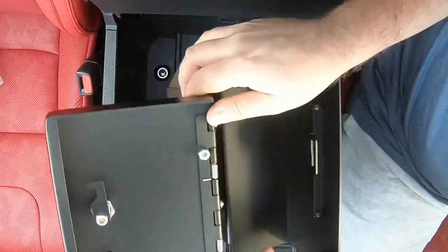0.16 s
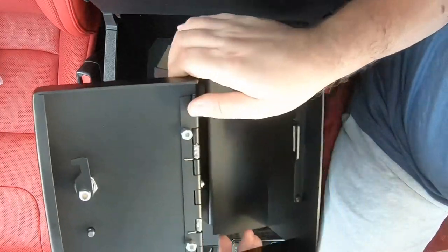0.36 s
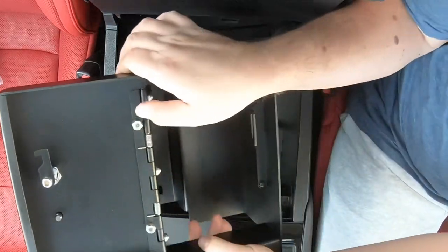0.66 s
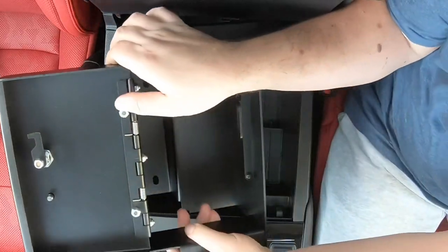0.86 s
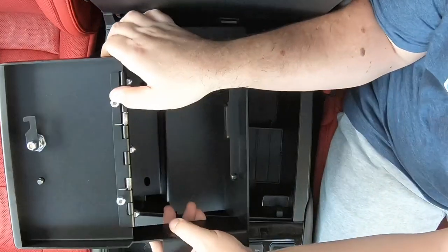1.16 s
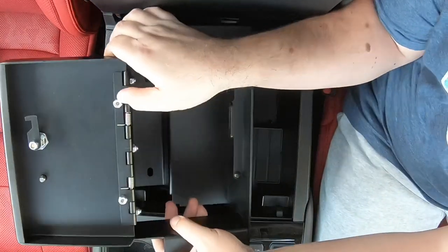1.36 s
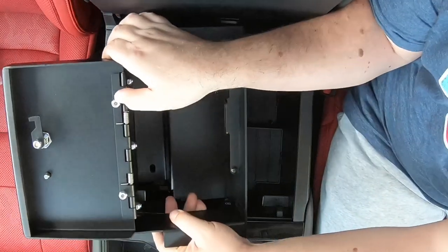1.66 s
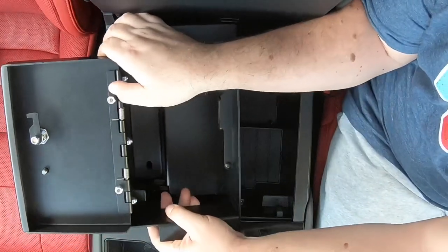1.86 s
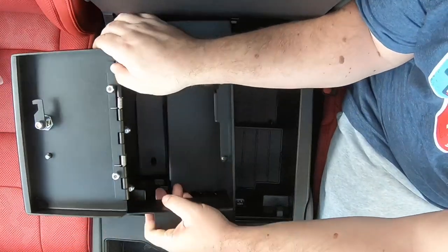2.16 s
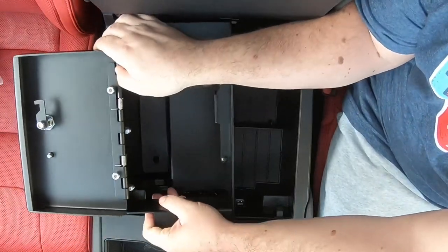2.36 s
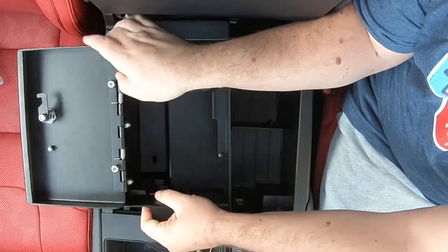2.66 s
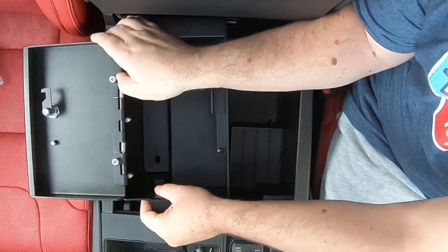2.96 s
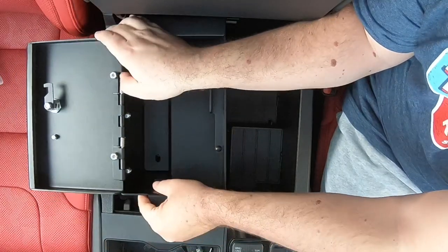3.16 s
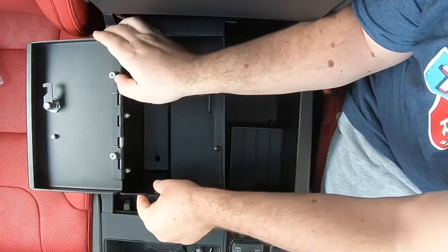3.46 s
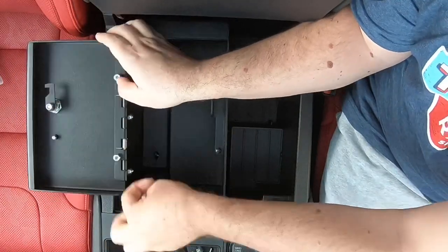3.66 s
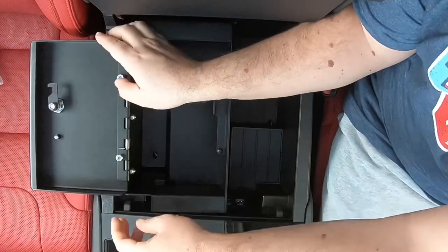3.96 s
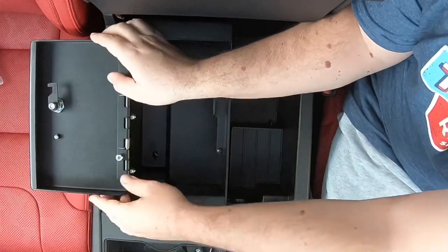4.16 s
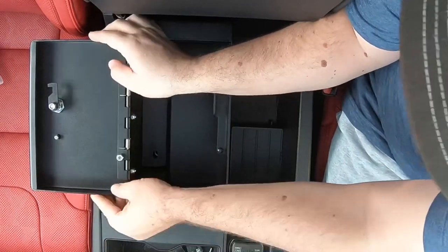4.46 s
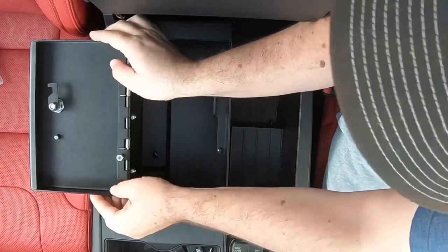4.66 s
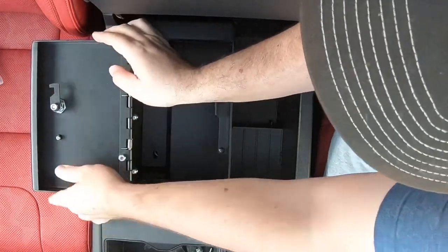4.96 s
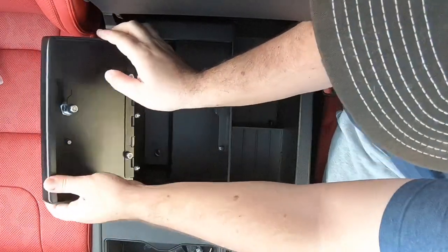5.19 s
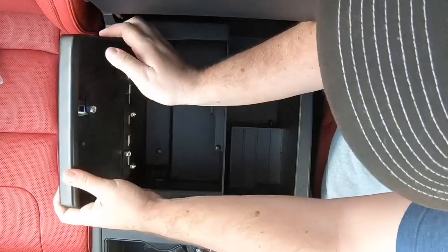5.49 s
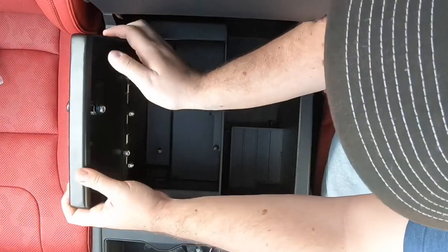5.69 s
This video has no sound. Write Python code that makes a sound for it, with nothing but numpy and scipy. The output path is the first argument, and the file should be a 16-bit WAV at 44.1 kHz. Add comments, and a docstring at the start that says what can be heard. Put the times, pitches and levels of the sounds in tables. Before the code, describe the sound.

Close, dry sound inside a quiet parked car: light taps and soft scraping with faint hiss as a steel box is held, then a hard thud as it lands in a hollow plastic bin. Isolated clacks follow, then busier knocking and rubbing, a tight cluster of loud bangs and scrapes, a near-quiet pause, and one sharp scraping clack. Low booming shakes the microphone, mostly on the right.

```python
"""Light knocks, thuds and soft scraping over hiss, then hard clacks and thuds:
a steel safe is lowered into the plastic console bin of a parked car and worked into place.
Contacts ring damped steel and console modes under shaped noise bursts; sliding drives them with noisy slips.
The jolts also shake the camera mount, whose drifting sines boom and sway, mostly into the right microphone."""
import sys
import numpy as np
from scipy import signal
from scipy.fft import rfft, irfft, next_fast_len
from scipy.io import wavfile
from scipy.ndimage import map_coordinates

SR = 44100
rng = np.random.default_rng(int(sys.argv[2]) if len(sys.argv) > 2 else 0)


def bounce(signal):
    """Save signal as a 16-bit WAV file at the path given by the first command-line argument."""
    frames = np.transpose(np.atleast_2d(signal))
    limited = np.clip(frames, -1, 1)
    pcm = np.round(limited * 32767).astype(np.int16)
    wavfile.write(sys.argv[1], SR, pcm)


N = 257103


def amp(db):
    """Decibels to gain."""
    return 10 ** (np.asarray(db) / 20)


def unit(x):
    """Scale to rms 1."""
    return x / np.sqrt(np.mean(x ** 2) + 1e-20)


def fade(t, t60):
    """Decay by 60 dB in t60 seconds."""
    return np.exp(-np.log(1000) * t / t60)


def along(points, hz, axis=1):
    """One column of a frequency table, read on a log axis."""
    table = np.transpose(points)
    return np.interp(np.log(hz + 1), np.log(table[0] + 1), table[axis])


def curves(rows):
    """One value per sample for each column after the time."""
    time_s, *columns = np.transpose(rows)
    return [np.interp(np.arange(N) / SR, time_s, column) for column in columns]


def wobble(rate_hz):
    """A smooth random curve, rate_hz knots a second."""
    knots = rng.standard_normal(int(N * rate_hz / SR) + 4)
    return map_coordinates(knots, [np.arange(N) * rate_hz / SR])


def add(track, time_s, sound):
    """Mix a sound into a track at time_s."""
    start = max(round(time_s * SR), 0)
    part = sound[..., :N - start]
    track[..., start:start + part.shape[-1]] += part


def filtered(x, response):
    """x times a complex response of frequency."""
    size = 2 * next_fast_len(N // 2 + 8192)
    hz = np.fft.rfftfreq(size, 1 / SR)
    return irfft(rfft(x, size) * response(hz), size)[..., :N]


def coloured(x, spectrum):
    """Causal (minimum-phase) filter with the given spectrum; white noise keeps its power."""
    def response(hz):
        cepstrum = irfft(np.log(unit(amp(along(spectrum, hz))) + 1e-6))
        cepstrum[1:len(hz) - 1] *= 2
        cepstrum[len(hz):] = 0
        return np.exp(rfft(cepstrum))
    return filtered(x, response)


def ring(modes, t):
    """One damped sine for each mode; mode gains have rms 1, divided by the root of their number."""
    hz, db, t60 = np.transpose(modes)[:, :, None]
    gain = unit(amp(db)) / np.sqrt(len(modes))
    return gain * np.sin(2 * np.pi * hz * t) * fade(t, t60)


def resonate(x, modes, seconds=0.23):
    """Pass a pair of signals through a set of modes; white noise keeps its power."""
    answer = ring(modes, np.arange(round(seconds * SR)) / SR).sum(axis=0)
    return signal.fftconvolve(x, answer[None] / np.linalg.norm(answer), axes=1)[:, :N]


SWELL_SHAPE = 1.11  # exponent: 1 pointed, 2 rounded


def swells(rows):
    """Sum of swells (peak, rise, fall, levels): one strength curve for each level column."""
    force = np.zeros((len(rows[0]) - 3, N))
    t = np.arange(-SR // 2, SR) / SR
    for peak_s, rise_s, fall_s, *levels_db in rows:
        shape = np.exp(-np.abs(t / np.where(t < 0, rise_s, fall_s)) ** SWELL_SHAPE)
        add(force, peak_s + t[0], amp(levels_db)[:, None] * shape[peak_s + t >= 0])
    return force


LANDING_S, LANDING_FADE_S = .98, 0.024


def lifted(change_db):
    """A gain of change_db while the safe is held in the air, and of 0 dB once it has landed."""
    return amp(curves([(LANDING_S - LANDING_FADE_S, change_db), (LANDING_S, 0)])[0])


HUSH_DB = -57  # after landing, ahead of the ports
# cabin hiss colour: (frequency [Hz], relative level [dB])
CABIN_SPECTRUM = [(20, 8), (60, -15), (140, -5.5), (280, -5), (420, -17), (550, -25), (800, -15.5),
                  (1050, -25.5), (2200, -32.5), (3100, -30.5), (4600, -35), (6400, -29.5), (8500, -42),
                  (11000, -42.5), (14000, -56)]


def cabin():
    """Quiet background hiss as coloured noise, stronger until the safe lands."""
    hiss = coloured(rng.standard_normal((2, N)), CABIN_SPECTRUM)
    return amp(HUSH_DB) * lifted(change_db=9) * hiss


BOOM_PER_THUD_DB, BOOM_PER_JUDDER_DB = 1, 4  # drive from blows and from sliding
BOOM_GROWTH = 0.87  # dB of boom per dB of thud
BOOM_RISE_S, BOOM_T60_S = 0.031, 0.58


def boom_strength(judder):
    """Thuds and judder feed energy into the mount, which builds up briefly and dies away."""
    feed = (amp(BOOM_PER_JUDDER_DB) * judder) ** 2 / (SR * BOOM_T60_S)
    for time_s, _, thud_db, _ in KNOCKS:
        add(feed, time_s, amp([BOOM_PER_THUD_DB + BOOM_GROWTH * thud_db]) ** 2)
    t = np.arange(SR) / SR
    answer = (1 - np.exp(-t / BOOM_RISE_S)) * fade(t, BOOM_T60_S)
    energy = signal.fftconvolve(feed * lifted(change_db=-52) ** 2, answer ** 2)[:N]
    return np.sqrt(np.abs(energy))


RUMBLE_PER_SWAY_DB = -19
# swing of the mount, ahead of channel gains: (time [s], level [dB])
SWAY = [(0.0, -69), (0.08, -48), (0.99, -44), (1.05, -30), (1.48, -30), (1.57, -41.5), (1.72, -23),
        (2.22, -16.5), (2.89, -27.5), (2.94, -23.5), (3.02, -17.5), (3.44, -22.5), (3.52, -32.5),
        (3.9, -13.5), (4.74, -24.5), (5.18, -23), (5.31, -13.5), (5.83, -20)]
# rumble colour: (frequency [Hz], relative level [dB])
RUMBLE_SPECTRUM = [(20, -19.5), (40, -2.5), (58, 2), (75, -5.5), (105, -2.5), (135, -11), (220, -37.5),
                   (600, -81)]


def mount(judder, sway_hz=25.18, boom_hz=100.46):
    """The camera mount swings on its arm, booms at a higher bending mode and rumbles with both."""
    strength = boom_strength(judder)
    reach = amp(curves(SWAY)[0])
    swing = 2 * np.pi * np.cumsum(sway_hz + 0.2 * wobble(3.0)) / SR
    jostle = np.minimum(judder / amp(-37), 1)  # sliding knocks the boom off its pitch
    bend = 2 * np.pi * np.cumsum(boom_hz + (1.144 + 5 * jostle) * wobble(22)) / SR
    # rows: left, right
    sway = reach * np.array([amp(-7.0) * np.sin(swing - 1.2), amp(9.5) * np.sin(swing)])
    boom = strength * np.array([amp(-21.5) * np.sin(bend - .5), amp(1.5) * np.sin(bend)])
    shaking = np.hypot(strength, amp(RUMBLE_PER_SWAY_DB) * reach)
    noise = coloured(rng.standard_normal((2, N)), RUMBLE_SPECTRUM)
    rumble = shaking * amp([[-8], [-4.5]]) * noise
    return sway + boom + rumble


# single ringing notes, the held safe's low steel note near 420 Hz, then higher squeaks of the lid;
# ahead of the ports: (time [s], frequency [Hz], level [dB], t60 [s])
PINGS = [(0.003, 425, -29, 0.075), (0.294, 420, -34, 0.15), (0.421, 977, -41.5, 0.12),
         (5.144, 2104, -43.5, 0.3)]


def pings():
    """Single ringing notes, each a damped sine: the held safe's low steel note, then higher squeaks of the lid."""
    pair = np.zeros((2, N))
    t = np.arange(SR // 3) / SR
    for time_s, hz, db, t60_s in PINGS:
        add(pair[0], time_s, amp(db) * np.sin(2 * np.pi * hz * t) * fade(t, t60_s))
    return pair


def friction(slips_per_s, grain_db, rough_db):
    """Steel dragging over grained plastic: slips of uneven size on a rough hiss."""
    struck = rng.random(N) < slips_per_s / SR
    slips = struck * rng.standard_normal((2, N)) * amp(1.2 * rng.standard_normal(N))
    hiss = rng.standard_normal((2, N))
    return unit((hiss + amp(grain_db) * unit(slips)) * amp(rough_db * wobble(70)))


# an edge binds just before it gives way: (peak time [s], rise [s], fall [s], level [dB])
BINDINGS = [(0.93, .13, 0.12, -57), (3.54, 0.013, .055, -38), (5.05, 0.054, 0.029, -53)]
# resonances of that edge: (frequency [Hz], relative level [dB], t60 [s])
EDGE_MODES = [(1800, -2.5, 0.039), (3030, 2.5, 0.014), (3350, -3.5, 0.015), (4330, -3, 0.011),
              (5970, -5.5, .01), (6100, -11.5, 0.0072)]


def squeal(top_hz=7800):
    """Fast slips of the binding edge keep its resonances sounding."""
    slips = swells(BINDINGS) * friction(slips_per_s=640, grain_db=-0.5, rough_db=1.5)
    return filtered(resonate(slips, EDGE_MODES), lambda hz: 1 / (1 + (hz / top_hz) ** 12))


# pushes that slide the safe or its lid; relative levels:
# (peak time [s], rise [s], fall [s], scrape level [dB], hiss level [dB], judder level [dB])
SHOVES = [(0.13, 0.18, 0.042, -51.5, -71, -38.5), (0.29, 0.089, 0.052, -46, -54, -38),
          (0.42, 0.074, 0.1, -52, -52, -48), (1.03, 0.06, 0.056, -49, -55, -44.5),
          (1.275, 0.07, .022, -57.5, -63.5, -22.5), (1.5, 0.24, 0.17, -63, -71.5, -49),
          (1.75, 0.039, 0.034, -52.5, -66.5, -40), (1.99, 0.11, 0.12, -47, -62.5, -29.5),
          (2.13, .012, 0.031, -39.5, -55, -23), (2.18, 0.071, 0.057, -43.5, -55.5, -33.5),
          (2.4, 0.29, 0.13, -69.5, -75, -53.5), (2.6, 0.05, .07, -47.5, -58.5, -30.5),
          (2.77, 0.085, 0.016, -42.5, -54, -27), (2.93, 0.057, .05, -64, -64.5, -35),
          (3.065, 0.033, .03, -45.5, -60, -32.5), (3.2, 0.041, 0.037, -69, -85, -34),
          (3.535, 0.016, .03, -43, -49.5, -39), (3.607, 0.016, 0.013, -29, -30.5, -34.5),
          (3.665, 0.043, 0.056, -31.5, -51, -22), (3.86, .02, 0.028, -63.5, -90.5, -67),
          (4.4, 0.36, 0.49, -67.5, -76, -62.5), (4.43, 0.043, .04, -76.5, -79, -54),
          (4.91, 0.078, 0.038, -63, -65, -44), (5.05, 0.03, .06, -43, -61.5, -36.5),
          (5.108, 0.027, 0.013, -22.5, -37, -23.5), (5.153, 0.0071, 0.007, -32, -34, -26.5),
          (5.2, 0.077, .025, -45, -55.5, -23.5), (5.465, 0.033, 0.036, -54, -69, -43.5),
          (5.57, .025, .03, -62.5, -92, -41), (5.69, .05, .06, -74, -86.5, -50.5),
          (5.82, .04, .04, -58, -65, -52.5)]
RUB_DAMPING = .35  # share of t60 left while walls are pressed on plastic
# scrape colour: (frequency [Hz], relative level [dB])
SCRAPE_SPECTRUM = [(200, -27.5), (430, 11.5), (570, -6), (780, 1.5), (1020, -5), (1450, -7), (1900, -6.5),
                   (2350, -16), (3100, -9.5), (4000, -21.5), (5500, -26.5), (9000, -60.5)]


def scrapes(scrape, hiss, judder):
    """Sliding excites the steel walls, their edges and the console."""
    rub = scrape * friction(slips_per_s=200, grain_db=-5.5, rough_db=1.5)
    pressed = [(hz, db, RUB_DAMPING * t60) for hz, db, t60 in STEEL_MODES]
    walls = amp(-2.0) * coloured(rub, SCRAPE_SPECTRUM) + amp(-9.5) * resonate(rub, pressed)
    edge_rub = hiss * friction(slips_per_s=470, grain_db=-12.5, rough_db=1.8)
    edges = coloured(amp(-5.5) * edge_rub, TICK_SPECTRUM)
    drag = judder * friction(slips_per_s=310, grain_db=-10.5, rough_db=5.0)
    shudder = amp(-4.5) * lifted(change_db=-1) * coloured(drag, THUD_SPECTRUM)
    groan = amp(-7) * resonate(drag, CONSOLE_MODES[1:])  # rubbing is too light for the lowest mode
    return walls + edges + shudder + groan


def burst(t, attack, t60, tail_db, tail_t60):
    """A pair of noises: a quick crash and its longer rattle round the cabin."""
    decay = fade(t, t60) + amp(tail_db) * fade(t, tail_t60)
    return rng.standard_normal((2, len(t))) * (1 - np.exp(-t / attack)) * decay


def strike(rings, scatter_db):
    """Every blow shares its strength among the modes in a new way."""
    return unit(amp(scatter_db * rng.standard_normal(len(rings)))) @ rings


def spot(t, t60, count=30):
    """Each point of contact has short modes of its own."""
    modes = [(hz, 0, t60) for hz in rng.uniform(600, 6000, count)]
    sound = strike(ring(modes, t[:SR // 14]), scatter_db=4.5)
    return np.pad(sound, (0, len(t) - len(sound)))


HEAVY_DB, HEAVY_GROWTH = -15, 0.51  # thud threshold; extra dB per dB above it
FLOOR_HZ, FLOOR_WIDTH_HZ = 323, 26
# hollow plastic console: (frequency [Hz], relative level [dB], t60 [s])
CONSOLE_MODES = [(137, 6.5, 0.072), (195, -8.5, 0.08), (248.5, -11.5, 0.45), (289.7, -4, 0.2),
                 (312.7, 3.5, 0.1), (335, -4.5, 0.09), (416, -15.5, 0.34), (505, -27.5, 0.082)]


def heavy_ring(thud_db):
    """Gain of each console mode: heavy blows reach the bin's floor, whose modes grow faster than the blow."""
    hz = np.transpose(CONSOLE_MODES)[0]
    nearness = np.exp(-((hz - FLOOR_HZ) / FLOOR_WIDTH_HZ) ** 2)
    return amp(HEAVY_GROWTH * max(thud_db - HEAVY_DB, 0) * nearness)[:, None]


# contacts of safe and bin; relative levels, sharpness high for a bare edge, low for a flat wall:
# (time [s], clack level [dB], thud level [dB], sharpness [dB])
KNOCKS = [(0.003, -34, -38, -3), (0.067, -43.5, -39.5, -2), (0.117, -35.5, -39, -11),
          (0.232, -41.5, -34, -13), (0.301, -43.5, -34, 4), (0.382, -52, -54.5, 25.5),
          (0.481, -61, -35, 25), (0.988, -23, -4, 13), (0.9959, -25, -8.5, 3.5), (1.014, -27, -11, 0.5),
          (1.491, -49, -62, 16), (1.569, -39, -36.5, -2), (1.623, -19, -8, -3), (1.647, -34.5, -20.5, 8),
          (1.717, -36.5, -48, -8), (1.811, -21.5, -6.5, -3), (1.831, -28, -34.5, -3.5),
          (1.895, -31, -19.5, -9), (1.973, -34, -31, -12), (2.114, -24, -14, 0.5), (2.168, -38, -30, -5),
          (2.255, -37, -39.5, -5), (2.384, -51, -36.5, -11), (2.538, -34.5, -22.5, -2),
          (2.575, -37.5, -37.5, 5.5), (2.649, -36.5, -38, -22.5), (2.7, -27.5, -34, -3),
          (2.759, -26, -14.5, 6), (2.774, -29, -18, -1.5), (2.856, -25, -12.5, -4.5),
          (2.897, -29.5, -19.5, -6.5), (2.938, -38.5, -29.5, -3), (3.011, -37, -45, -7.5),
          (3.073, -31, -26, -4.5), (3.095, -22, -13.5, 2.5), (3.122, -25, -14.5, 0),
          (3.142, -24.5, -14.5, 2), (3.308, -40, -28, -10.5), (3.571, -19.5, -4.5, -1),
          (3.612, -18, -11.5, 2), (3.634, -15.5, -10, 0.5), (3.659, -19, -6, -6),
          (3.689, -26.5, -10.5, -2.5), (3.769, -44.5, -40, -15.5), (4.089, -58, -54, -2),
          (4.189, -53, -57.5, 12), (4.308, -62, -51, 25), (4.381, -59, -44, -1), (4.451, -64.5, -53.5, 0.5),
          (4.571, -56, -50.5, -5), (5.082, -33, -25, 16.5), (5.09, -19.5, -6.5, -1),
          (5.133, -19.5, -11.5, 5), (5.144, -29.5, -28, 16), (5.436, -50.5, -36.5, -9.5)]
# steel walls, t60 ahead of hand damping: (frequency [Hz], relative level [dB], t60 [s])
STEEL_MODES = [(432, 2, .16), (653, 0, .33), (737, -2, .3), (846, -4, .3), (1233, -5, .32), (1441, -1, .3),
               (1597, -3, .28), (1728, -6, .25), (1890, -9, .26), (2030, -9, .26), (2452, -12, .22),
               (2726, -12, .22), (3122, -10, .22), (3484, -13, .22), (4276, -19, .2)]
# contact colours, wall clack, corner bite, edge tick, console thud: (frequency [Hz], relative level [dB])
CLACK_SPECTRUM = [(200, -28.5), (420, 4), (560, -2), (700, 0), (1000, -4.5), (1450, -5.5), (2150, -17),
                  (3200, -26), (5200, -49.5), (10000, -70.5)]
BITE_SPECTRUM = [(1200, -27.5), (2100, -2.5), (2600, 3.5), (3300, 3.5), (4100, -4.5), (5200, -19.5),
                 (9000, -53.5)]
TICK_SPECTRUM = [(2500, -24), (4300, -0.5), (5200, -0.5), (6400, 2), (7600, -8), (8600, -17.5),
                 (11000, -30), (15000, -39)]
THUD_SPECTRUM = [(25, -24.5), (50, 0.5), (90, -17), (150, -5.5), (200, 0), (310, -0.5), (400, -12),
                 (550, -29), (900, -35.5), (2000, -93)]
TICK_DB, BITE_DB = -22, -18.5  # against the clack, at sharpness 0
BITE_PER_SHARP = 0.76  # dB of bite per dB of sharpness
GRIP_T60_S = .4  # extra decay: the hands damp the steel walls


def knocks():
    """Each contact sets off the steel walls, their stiff corners, a sharp edge tick and the console's low modes."""
    clack, bite, tick, thud, modes = np.zeros((5, 2, N))
    t = np.arange(SR // 3) / SR
    steel = ring(STEEL_MODES, t) * fade(t, GRIP_T60_S)
    console = ring(CONSOLE_MODES, t) * (1 - np.exp(-t / 0.0026))  # plastic gives way: soft start
    for time_s, clack_db, thud_db, sharp_db in KNOCKS:
        touch_s = time_s - .001  # each blow starts 1 ms before its listed time
        bite_db = clack_db + BITE_DB + BITE_PER_SHARP * sharp_db
        tick_db = clack_db + TICK_DB + sharp_db
        contact_s = .0015 * amp(-.33 * (clack_db + 27.5))  # lighter blows stay in contact longer
        settle = 1 - np.exp(-t / contact_s)
        local = settle * spot(t, t60=0.042)
        crash = burst(t, attack=contact_s, t60=0.14, tail_db=-16, tail_t60=0.34)
        add(clack, touch_s, amp(clack_db - 5.0) * crash)
        add(clack[0], touch_s, amp(clack_db - 3.5) * local)
        corner = burst(t, attack=contact_s, t60=0.068, tail_db=-4.0, tail_t60=0.12)
        add(bite, touch_s, amp(bite_db) * corner)
        add(bite[0], touch_s, amp(bite_db) * local)
        edge = burst(t, attack=0.0024, t60=0.11, tail_db=-28.5, tail_t60=0.073)
        add(tick, touch_s, amp(tick_db) * edge)
        hollow = burst(t, attack=0.0011, t60=0.11, tail_db=-12.0, tail_t60=0.35)
        add(thud, touch_s, amp(thud_db - 8.0) * hollow)
        walls = settle * strike(steel, scatter_db=4.5)
        add(modes[0], touch_s, amp(clack_db - 11.5) * walls)
        body = strike(console * heavy_ring(thud_db), scatter_db=3.5)
        add(modes[0], touch_s, amp(thud_db + 2.5) * body)
    chatter = unit(amp(1.6 * wobble(260)))  # loose lid and hinge buzz against the walls
    metal = coloured(clack, CLACK_SPECTRUM) + coloured(bite, BITE_SPECTRUM) + coloured(tick, TICK_SPECTRUM)
    return chatter * metal + lifted(change_db=-7) * coloured(thud, THUD_SPECTRUM) + modes


# two microphone ports:
# (frequency [Hz], likeness [0-1], left minus right level [dB], left lead [rad])
PORTS = [(50, .55, -4, .4), (100, .5, -9, -.5), (160, .88, -4, -.1), (230, .97, -5.5, -.1),
         (330, .98, -5.5, .1), (460, .65, -9, -.2), (650, .5, -7, 1.8), (950, .55, -2, 1.8),
         (1400, .62, 0, 1.0), (2000, .65, -1, 1.0), (3200, .65, -2, .5), (6000, .5, -3, .4),
         (12000, .5, -5, .3)]


def microphones(pair):
    """The first signal reaches both ports alike; the second is the diffuse share that tells them apart."""
    half = np.array([[.5], [-.5]])

    def shares(hz):
        turn = np.arccos(np.clip(along(PORTS, hz), 0, 1)) / 2
        return np.array([np.cos(turn), np.sin(turn)])

    def ports(hz):
        gain = amp(half * along(PORTS, hz, axis=2))
        return gain * np.exp(1j * half * along(PORTS, hz, axis=3))

    common, diffuse = filtered(pair, shares)
    return filtered(np.array([common + diffuse, common - diffuse]), ports)


def scene():
    """Knocks, single notes, scrapes and a squeal over the quiet cabin, plus the shaking mount."""
    scrape, hiss, judder = swells(SHOVES)
    sources = cabin() + pings() + squeal() + scrapes(scrape, hiss, judder) + knocks()
    return microphones(sources) + mount(judder)


TOP_HZ = 15000


def record(dry):
    """The hardest blows saturate each channel; nothing is kept above the band limit."""
    squashed = dry / (1 + np.abs(dry) ** 8) ** (1 / 8)
    return filtered(squashed, lambda hz: hz < TOP_HZ)


dry = scene()
out = record(dry)
bounce(out)
```